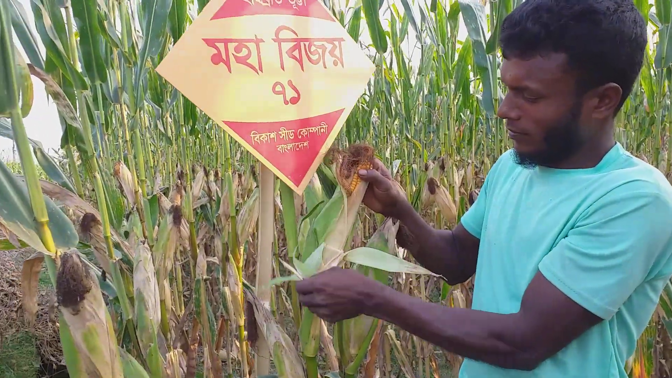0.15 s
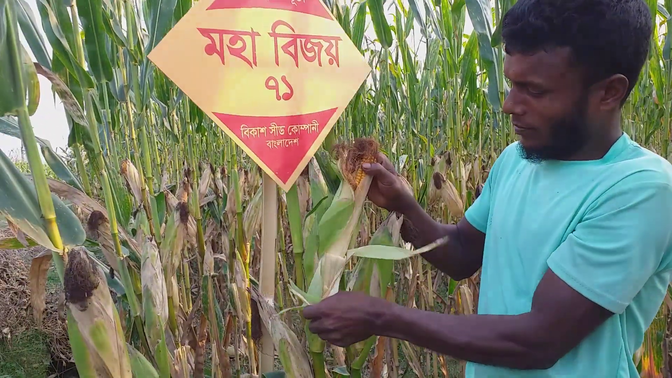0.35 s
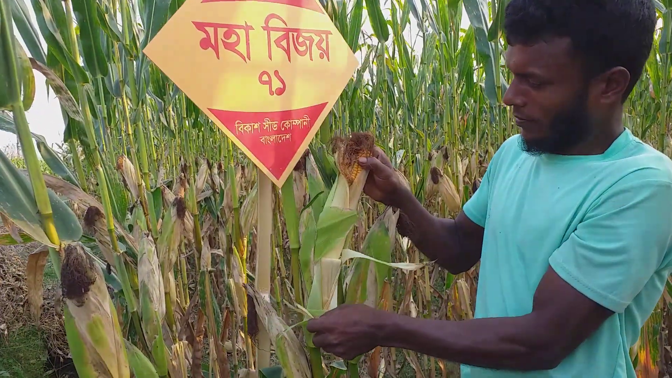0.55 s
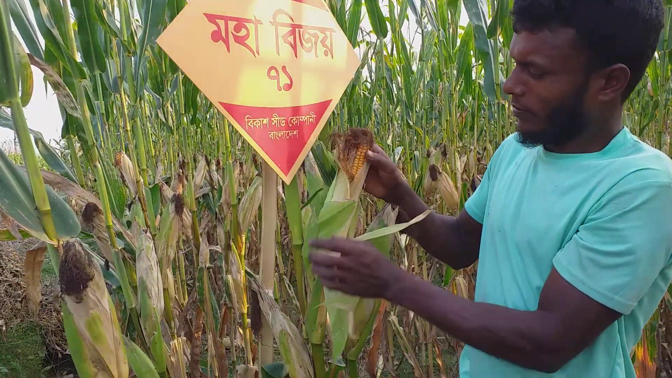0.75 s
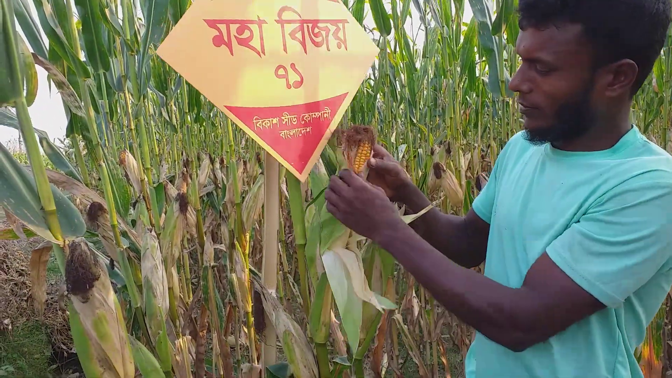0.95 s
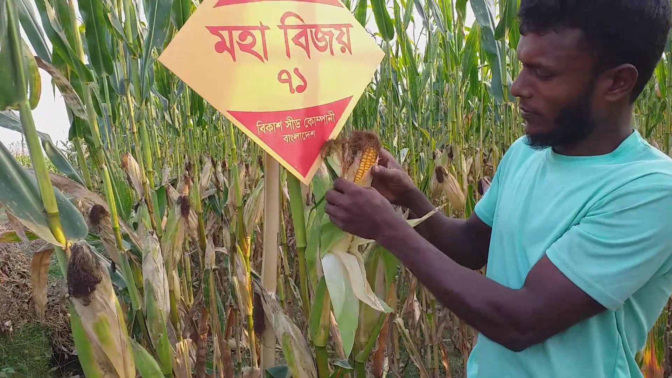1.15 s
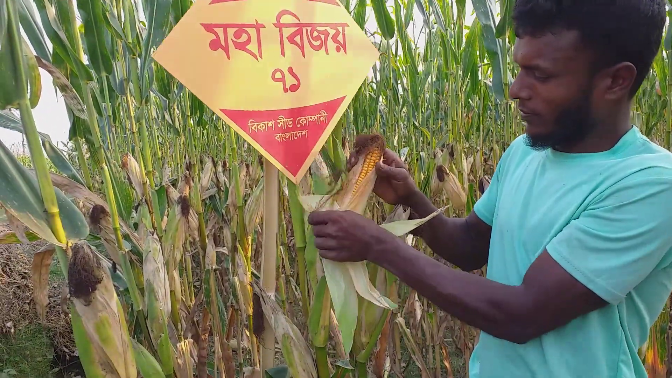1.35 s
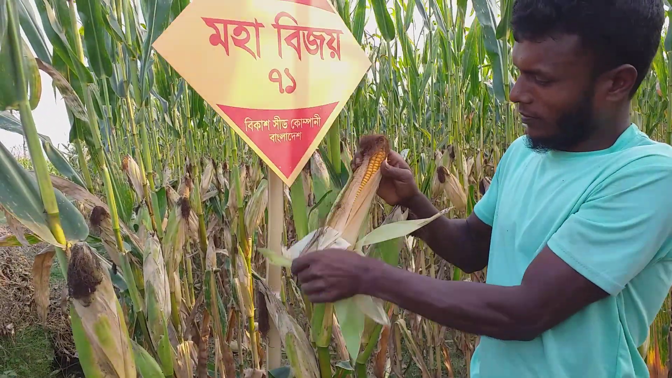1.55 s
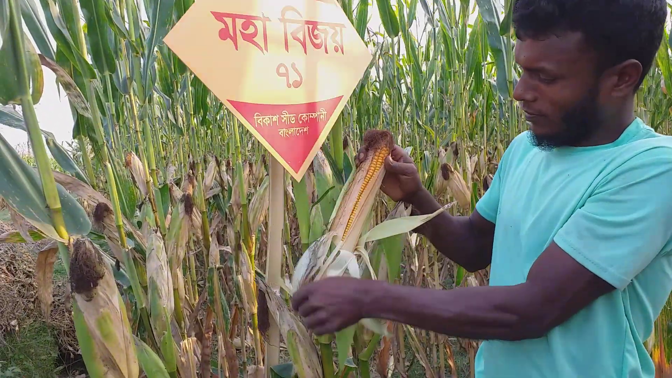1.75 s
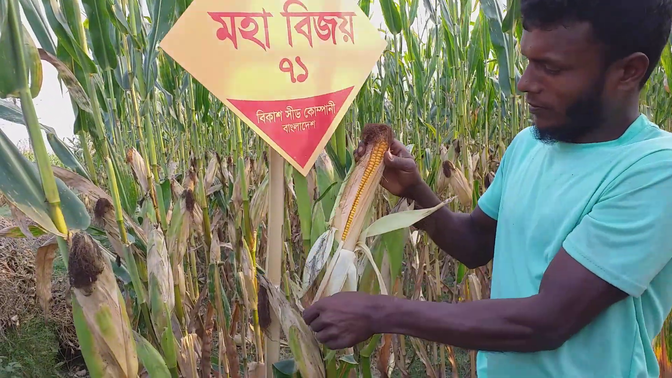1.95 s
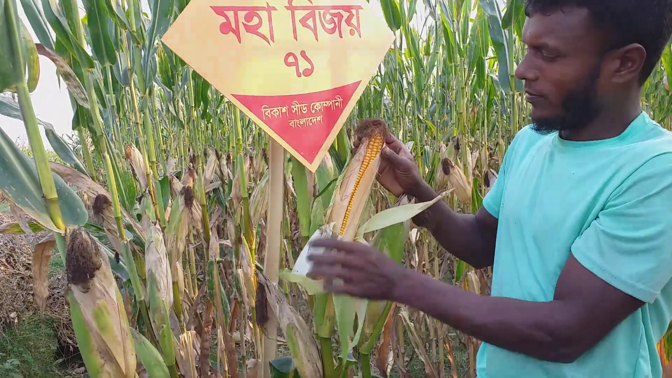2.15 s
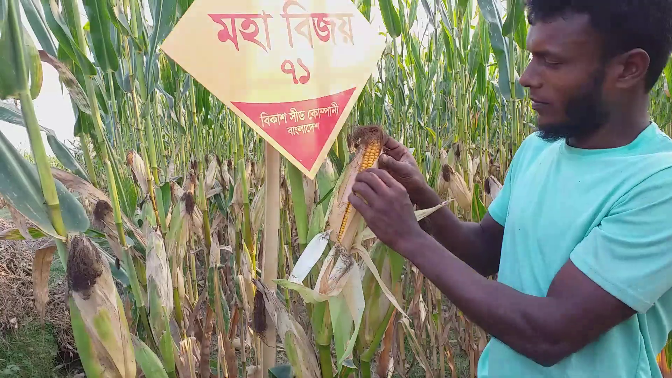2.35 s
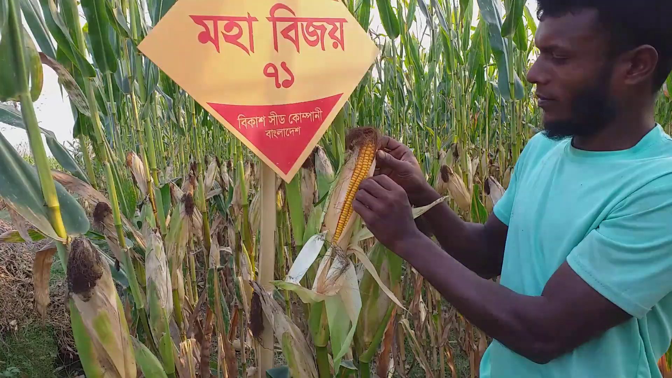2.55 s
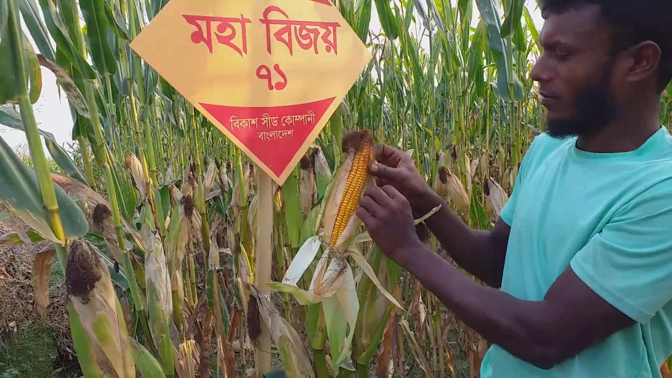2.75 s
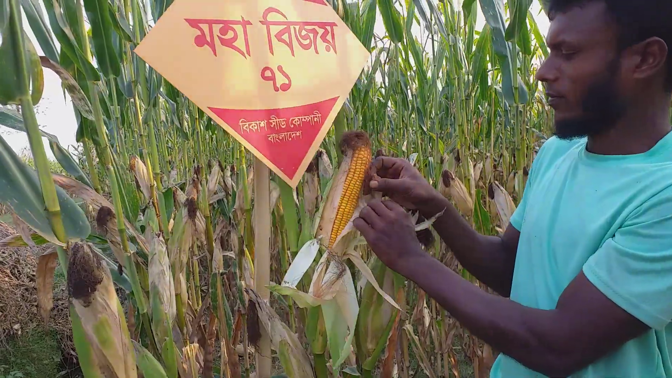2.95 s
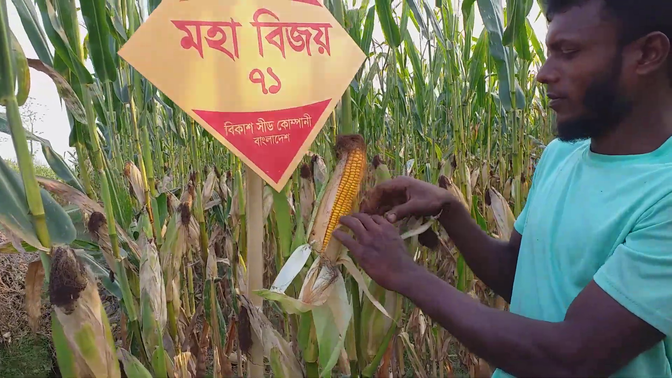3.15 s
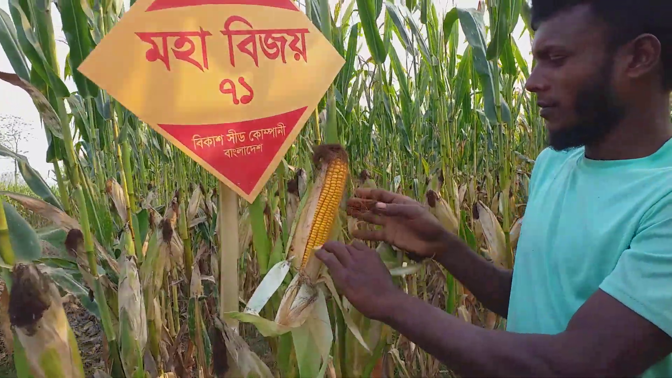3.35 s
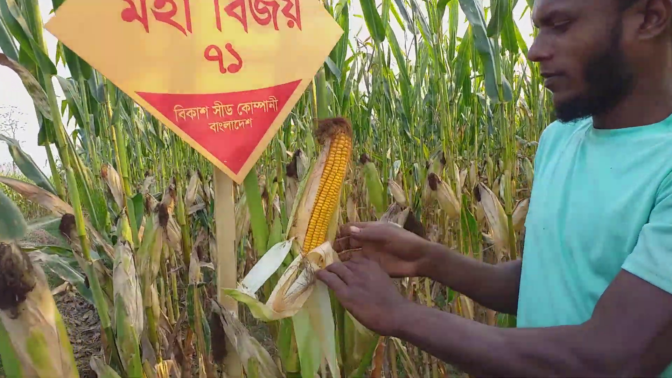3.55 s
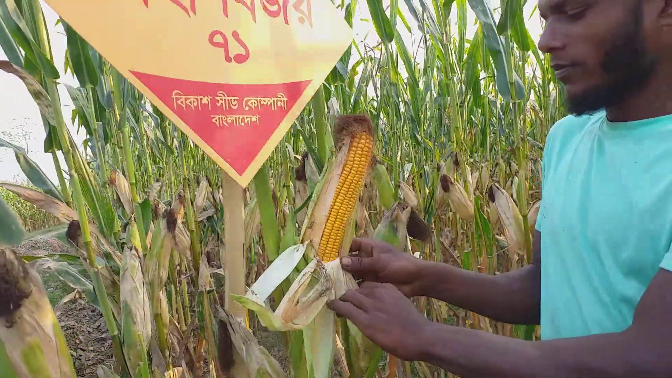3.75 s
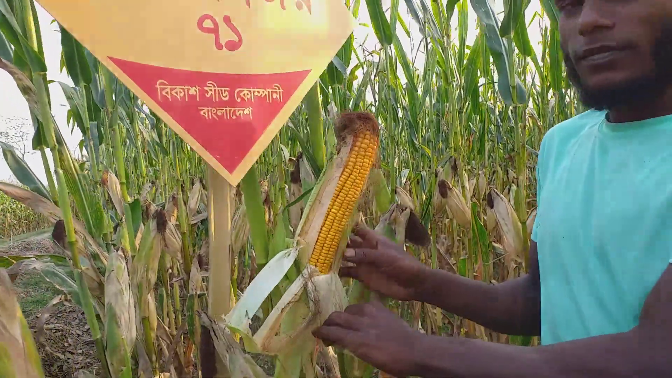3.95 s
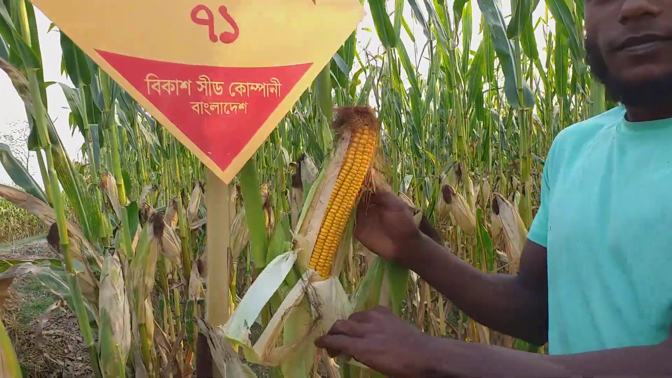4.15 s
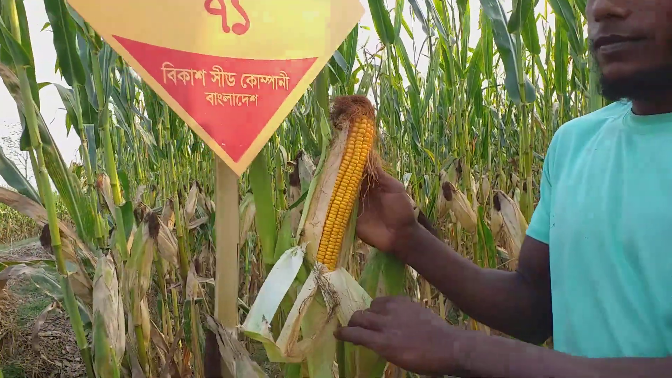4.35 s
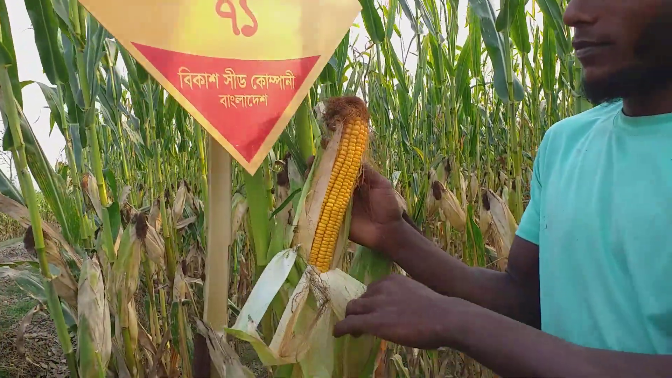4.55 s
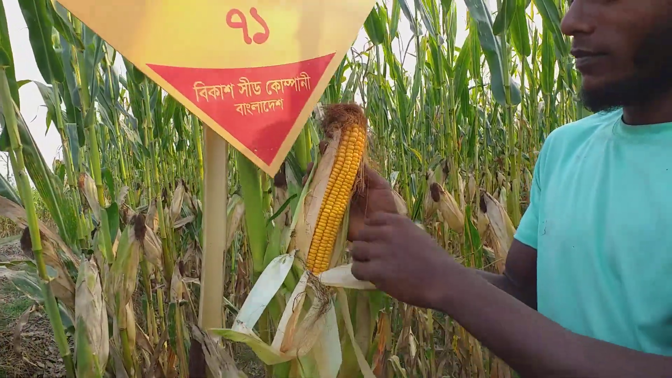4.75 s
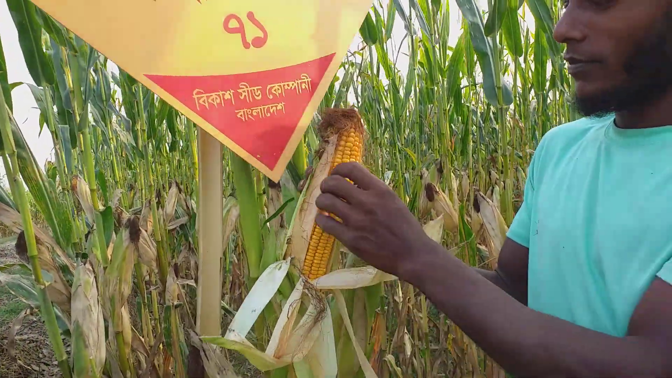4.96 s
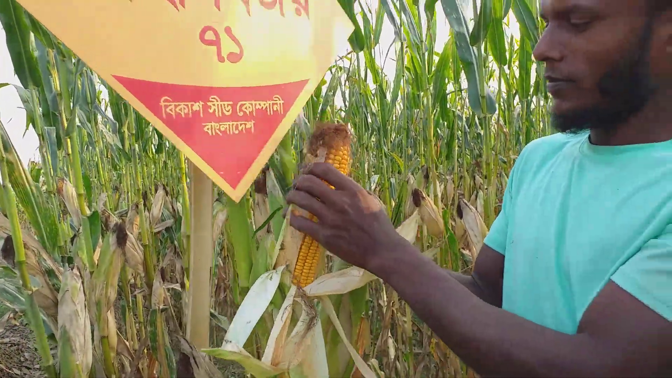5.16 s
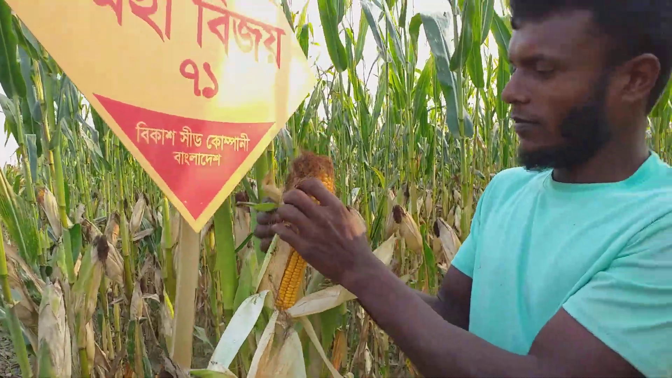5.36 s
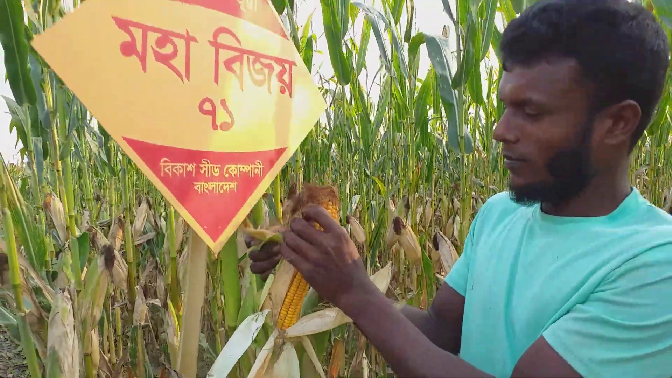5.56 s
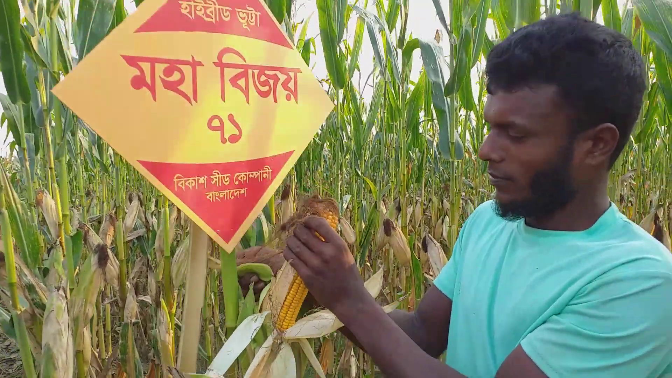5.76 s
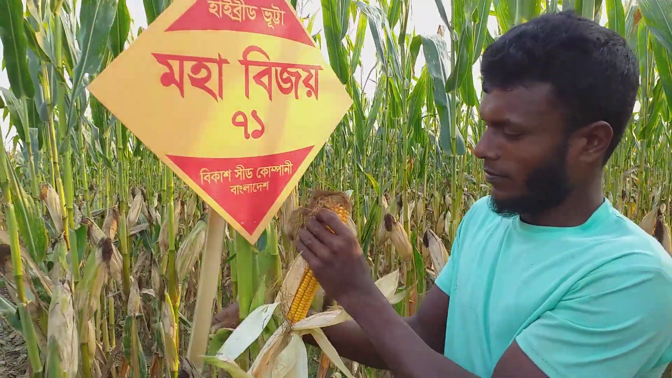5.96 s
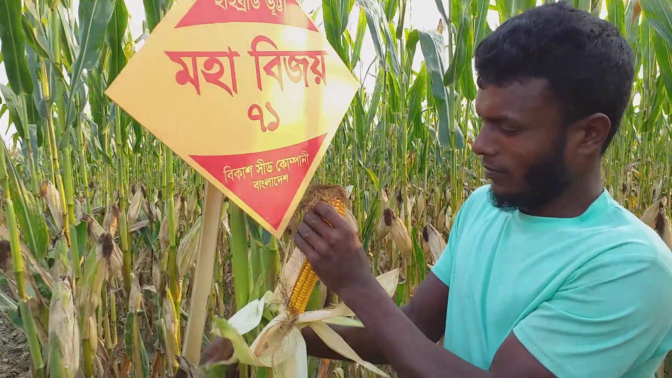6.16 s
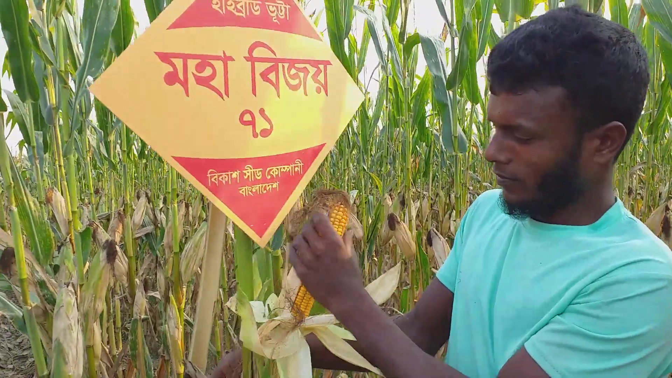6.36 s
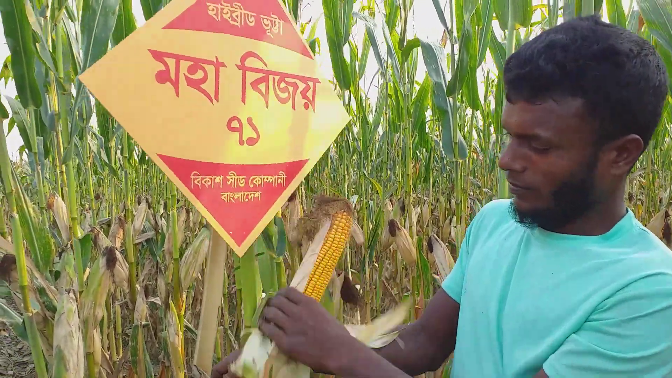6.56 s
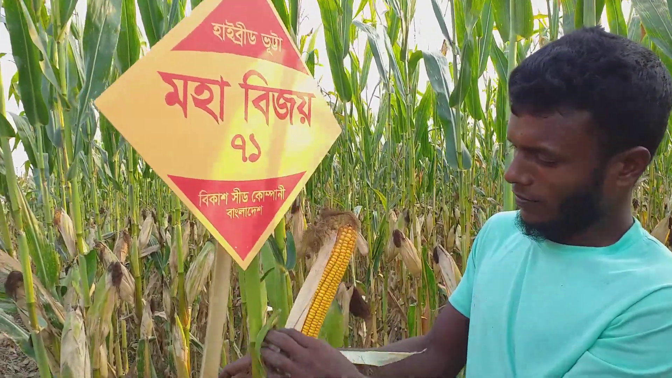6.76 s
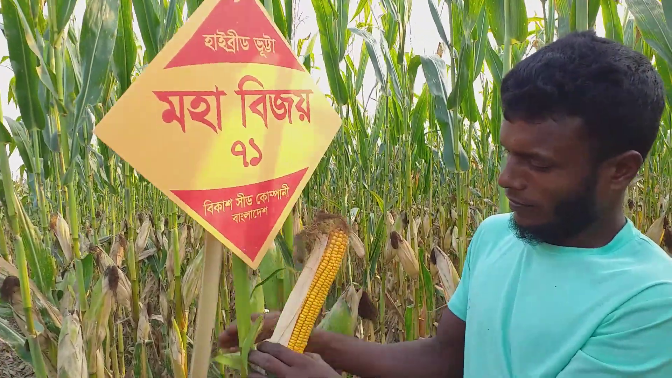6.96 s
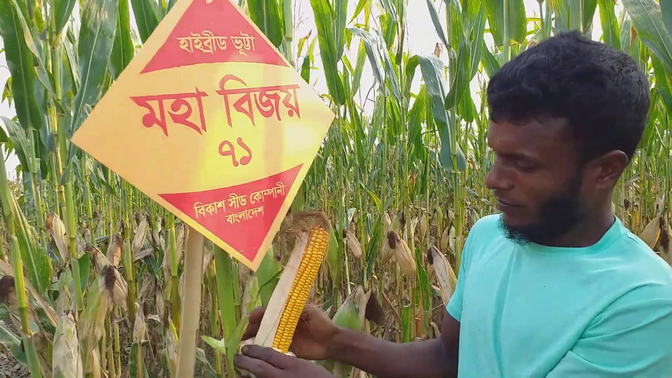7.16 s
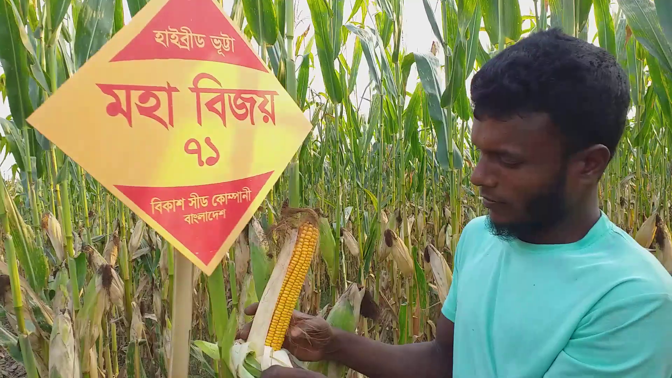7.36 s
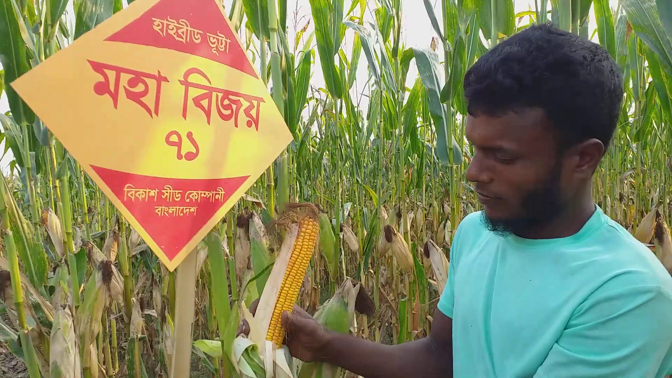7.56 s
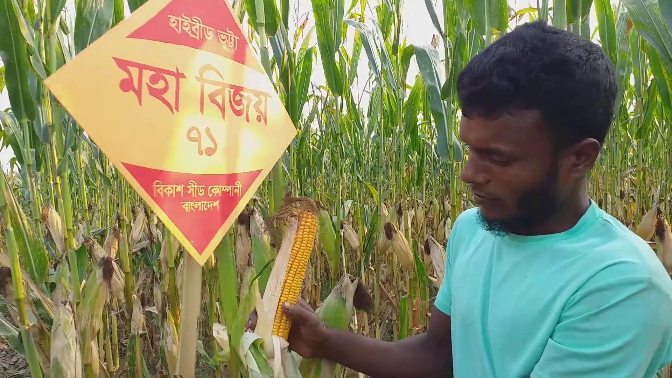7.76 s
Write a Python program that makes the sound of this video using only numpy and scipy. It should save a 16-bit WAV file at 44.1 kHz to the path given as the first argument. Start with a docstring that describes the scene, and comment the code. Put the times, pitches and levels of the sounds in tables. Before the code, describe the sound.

Dry, crisp husk tearing sits near the microphone outdoors, with only a weak scatter of echo from standing plants. Rapid rips start it, followed by brushing leaves, a second tearing run, a soft lull with dull bumps, and a loud cluster of snapping ribs. Later it becomes loose rustle, broken by a short hard snap and a closing rip, over low air and a distant, swelling hum.

```python
"""Husks are torn back by hand from an ear of corn in a quiet field: a quick run of pulls opens the scene.
Each pull is a fast run of fibre slips that rings the leaf; short squeaks sound near some pulls.
Loose husks rustle and ribs crack throughout, densest in the tearing after 3.3 s; soft bumps fall between.
A thin far whine comes and goes from 4.2 s; at 5.3 s two sharp ticks snap over a dull thump.
A last pull comes at 7.7 s; under it all lie a murmur of air and a distant hum that swells four times."""
import sys
import numpy as np
from scipy import signal
from scipy.fft import rfft, irfft, next_fast_len
from scipy.io import wavfile
from scipy.ndimage import uniform_filter1d

SR = 44100
rng = np.random.default_rng(int(sys.argv[2]) if len(sys.argv) > 2 else 0)


def bounce(signal):
    """Save signal as a 16-bit WAV file at the path given by the first command-line argument."""
    frames = np.transpose(np.atleast_2d(signal))
    limited = np.clip(frames, -1, 1)
    pcm = np.round(limited * 32767).astype(np.int16)
    wavfile.write(sys.argv[1], SR, pcm)


N = 348390
TIME_S = np.arange(N) / SR

# steady rubbing of the hands on the ear, before the rustle's trims:
# t/s, rubbing level/dB, leaf body re rubbing/dB, sheath hollow re rubbing/dB
CONTACT_CURVE = [(0, -32, -6.5, -14), (.55, -50, -9.5, -10.5), (1.1, -53.5, -7, -15),
                 (1.45, -47.5, -5, -4.5), (1.9, -50.5, -9.5, -12), (2.3, -53, -9.5, -29),
                 (2.95, -54.5, -10, -16), (3.3, -43, -9.5, -8), (4.05, -44.5, -10, -21),
                 (4.65, -46, -8.5, -15), (4.85, -50.5, -9.5, -14), (5.3, -44.5, -7.5, -13.5),
                 (6.28, -49.5, -4.5, -11), (6.55, -43.5, -8.5, -17.5), (7.62, -46.5, -9, -15.5),
                 (7.9, -41.5, -9, -20)]


def amp(db):
    """Decibels to gain."""
    return 10 ** (np.asarray(db) / 20)


def evened(x):
    """Scales to rms 1."""
    return x / np.sqrt(np.mean(x ** 2) + 1e-20)


def steadied(x, size):
    """Holds rms near 1 over every stretch of size samples; faster grain stays."""
    return x / np.sqrt(abs(uniform_filter1d(x ** 2, size)) + 1e-12)


def read(points, hz):
    """Reads a spectrum on a log-frequency axis."""
    f_hz, value = np.transpose(points)
    return np.interp(np.log(hz + 1), np.log(f_hz + 1), value)


def add(mix, start_s, sound):
    """Mixes a sound in at start_s, cut at the end of the mix."""
    part = mix[max(round(start_s * SR), 0):][:len(sound)]
    part += sound[:len(part)]


def colour(x, points, size=2048):
    """Minimum-phase filter with the given spectrum, so that clicks keep their sharp fronts."""
    hz = abs(np.fft.fftfreq(size, 1 / SR))
    log_gain = np.log(amp(read(points, hz)))
    taps = np.fft.ifft(np.exp(np.conj(signal.hilbert(log_gain)))).real
    return signal.fftconvolve(x, taps)[:len(x)]


def band(x, lo_hz, hi_hz):
    """Causal band-pass."""
    return signal.sosfilt(signal.butter(4, [lo_hz, hi_hz], "band", fs=SR, output="sos"), x)


def high_pass(hz):
    """Sections of a fourth-order high-pass."""
    return signal.butter(4, hz, "high", fs=SR, output="sos")


def registers(x):
    """Splits into top (unit level in 2.8-7 kHz), leaf body and sheath hollow (each rms 1)."""
    size = next_fast_len(len(x) + 512)
    hz, spectrum = np.fft.rfftfreq(size, 1 / SR), rfft(x, size)
    below_900, below_2800, below_7000 = [1 / (1 + (hz / edge_hz) ** 10) for edge_hz in (900, 2800, 7000)]
    gains = (below_900, below_2800 - below_900, below_7000 - below_2800, 1 - below_2800)
    hollow, body, crisp, top = (irfft(spectrum * gain, size)[:len(x)] for gain in gains)
    return top / np.std(crisp), evened(body), evened(hollow)


def resonate(x, hz, width_hz):
    """A resonance of gain 1 that follows the curve hz."""
    turn = np.exp(2j * np.pi * np.cumsum(hz) / SR)
    r = np.exp(-np.pi * width_hz / SR)
    return 2 * (turn * signal.lfilter([1 - r], [1, -r], x / turn)).real


def wander(count, size):
    """Smooth random curve of rms 1, twice averaged over size samples."""
    return evened(uniform_filter1d(uniform_filter1d(rng.standard_normal(count), size), size))


def grains(count, per_s, spread_db):
    """Sparse clicks of random sign: many small, a few large; rms 1."""
    sizes = amp(spread_db * np.minimum(rng.exponential(1, count), 4))
    signs = rng.choice([-1, 1], count)
    return evened(sizes * signs * (rng.random(count) < per_s / SR))


def swell(t, rise_s, hold_s, fall_s, curve=1.39):
    """Envelope from 0 to 1 and back: rise, hold, fall."""
    to_end_s = rise_s + hold_s + fall_s - t
    return np.clip(np.minimum(t / rise_s, to_end_s / fall_s), 0, 1) ** curve


def scatter(x, spread_s, share, count=4):
    """The leaf spreads every click over a millisecond or two, in a colour that shifts as it folds."""
    t = np.arange(300) / SR
    taps = rng.standard_normal((count, len(t))) * np.exp(-t / spread_s)
    taps /= np.linalg.norm(taps, axis=1)[:, None]
    folds = signal.fftconvolve(x[None], taps, axes=1)[:, :len(x)]
    weights = np.array([wander(len(x), size=700) for _ in range(count)])
    weights /= np.linalg.norm(weights, axis=0)
    return x + share * (folds * weights).sum(0)


def pull(start_s, rise_s, hold_s, fall_s, force_db, body_db, hollow_db, leaf_hz, fibre_hz, ring_db,
         median_slips_per_s=450, jitter=.28, uneven_db=0.5, fray_s=0.00062, leaf_ring=1., fibre_ring=0.77,
         build_db=1.5, glide=0.063, trim_db=-0.78):
    """Fibres let go one after another, almost regularly; each slip frays briefly and rings the leaf."""
    # filter for the fibre slips: f/Hz, gain/dB
    tearing = [(60, -29), (150, -13), (300, -21.5), (550, -9.5), (1000, -6.5), (1700, -2.5), (2450, -3.5),
               (3050, -4.5), (3500, 0), (4100, 4.5), (6000, 0), (8000, 0.5), (12000, -5), (16000, -3)]
    t = np.arange(0, rise_s + hold_s + fall_s, 1 / SR)
    progress = t / t[-1] - .5
    turns = np.cumsum(median_slips_per_s * np.exp(jitter * wander(len(t), size=50))) / SR
    slips = np.diff(np.floor(turns), prepend=0) * amp(uneven_db * rng.standard_normal(len(t)))
    fray_envelope = signal.lfilter([1], [1, -np.exp(-1 / (fray_s * SR))], slips)
    fraying = fray_envelope * rng.standard_normal(len(t))
    drive = colour(scatter(slips + .11 * fraying, spread_s=.0013, share=1.5), tearing)
    # leaf resonance rises and fibre resonance falls as the free length of the leaf changes
    leaf = resonate(drive, leaf_hz * (1 + glide * progress), width_hz=610)
    fibre = resonate(drive, fibre_hz * (1 - glide * progress), width_hz=480)
    ringing = amp(ring_db) * (leaf_ring * leaf + fibre_ring * fibre)
    crisp, body, hollow = registers(steadied(drive + ringing, size=600))
    # build_db: growth of the force over the whole pull
    force = swell(t, rise_s, hold_s, fall_s) * amp(force_db + build_db * progress + trim_db)
    return start_s, force * (crisp + amp(body_db) * body + amp(hollow_db) * hollow)


def crack(start_s, peak_db, body_db, hollow_db, crumble_s, crumble=0.5, break_s=0.00044, trim_db=1):
    """A rib gives way in a burst that peaks within half a millisecond, then its neighbours crumble."""
    # filter for breaking ribs: f/Hz, gain/dB
    cracking = [(60, -30), (150, -15), (400, -6.5), (1000, -4), (2200, -2), (3200, 0), (4500, 7.5),
                (6500, 6.5), (9000, 3.5), (16000, 3.5)]
    t = np.arange(1800) / SR
    burst = t / break_s * np.exp(1 - t / break_s) * rng.standard_normal(len(t))
    decay = crumble * (t > 2 * break_s) * np.exp(-t / crumble_s)
    after = decay * grains(len(t), per_s=13000, spread_db=4.0)
    crisp, body, hollow = registers(colour(burst + after, cracking))
    height = abs(band(crisp, 2800, 7000)).max()
    mixed = crisp + amp(body_db) * body + amp(hollow_db) * hollow
    return start_s, amp(peak_db + trim_db) * mixed / height


def ticks(count=120, mean_per_s=7, over_db=11.5, spread_db=2.5, body_db=-10, hollow_db=-16):
    """Small ribs break at random moments, louder where the steady rubbing is harder."""
    out = np.zeros(N)
    times_s = np.cumsum(rng.exponential(1, count)) / mean_per_s
    offsets_db = spread_db * rng.standard_normal((count, 3))
    for start_s, (size, body, hollow) in zip(times_s, offsets_db):
        peak_db = np.interp(start_s, *np.transpose(CONTACT_CURVE)[:2]) + over_db + size
        add(out, *crack(start_s, peak_db, body_db + body, hollow_db + hollow, crumble_s=0.0047))
    return out


def squeak(start_s, length_s, start_hz, end_hz, level_db, waver=0.021, overtone_db=-4):
    """Wet leaf squeaks on leaf: the slips lock into a short, unsteady note with two overtones."""
    count = int(length_s * SR)
    pitch_hz = np.linspace(start_hz, end_hz, count) * (1 + waver * wander(count, size=60))
    phase = 2 * np.pi * np.cumsum(pitch_hz) / SR
    note = sum(amp(overtone_db * k) * np.sin((k + 1) * phase) for k in range(3))
    return start_s, amp(level_db) * evened(note) * signal.windows.tukey(count, .6)


def snap(start_s=5.3151, thump_hz=380, thump_s=0.0012, thump_db=-5, push_hz=190, push_s=0.0019, push_db=-17,
         tick_db=2, second_db=-3, second_s=0.00182, tail_db=-42, tail_s=0.089):
    """Two ticks in quick succession over a heavily damped thump, with a faint low tail."""
    t = np.arange(SR // 3) / SR
    thump = amp(thump_db) * np.exp(-t / thump_s) * np.cos(2 * np.pi * thump_hz * t + np.pi / 4)
    push = -amp(push_db) * np.exp(-t / push_s) * np.cos(2 * np.pi * push_hz * t)
    clicks = np.zeros(len(t))
    clicks[[0, round(second_s * SR)]] = amp(tick_db), amp(second_db)
    # f/Hz, gain/dB
    clicks = colour(clicks, [(200, 4), (1500, -1.5), (4600, 3.0), (7000, -2), (12000, -0.5)])
    tail = amp(tail_db) * np.exp(-t / tail_s) * evened(band(rng.standard_normal(len(t)), 92, 630))
    return start_s, band(thump + push, 99, 7500) + clicks + tail


def rustle(rub=1., clump_db=0.92, trim_db=-.5, fizzle_s=0.0023, hollow_trim_db=-3.0, sizzle_edge_hz=8500):
    """Dry leaves slide over each other: clumps of tiny crackles over a soft rubbing hiss."""
    # filter for sliding leaves: f/Hz, gain/dB
    rustling = [(50, -20), (120, -8), (250, -11), (400, -6), (800, -7.5), (1200, -3.5), (1700, -0.5),
                (2400, 0), (3100, -1), (4100, 4.5), (5400, 1.5), (6600, 3), (9000, 0), (16000, 0)]
    clicks = grains(N, per_s=700, spread_db=2.5)
    # every crackle starts at once and fizzles out
    crackles = signal.lfilter([1], [1, -np.exp(-1 / (fizzle_s * SR))], clicks ** 2)
    drive = np.sqrt(crackles / crackles.mean() + rub ** 2) * rng.standard_normal(N)
    drive = steadied(drive * amp(clump_db * wander(N, size=220)), size=2000)
    top, body, hollow = registers(colour(drive, rustling))
    sizzle = signal.sosfiltfilt(high_pass(sizzle_edge_hz), top)
    layers = [top - sizzle, body, amp(hollow_trim_db) * hollow, sizzle]
    return amp(trim_db) * (rubbing() * layers).sum(0)


def rubbing(rise_share=0.18, fall_share=0.33):
    """Strength of crisp top, leaf body, sheath hollow and sizzle: powers of contact and strokes add."""
    # loose husks brushed aside, before the rustle's trims: start t/s, length/s, rubbing level/dB,
    # leaf body re rubbing/dB, sheath hollow re rubbing/dB, papery sizzle re rubbing/dB
    strokes = [ (0.136, .14, -48, -9, -10, -1), (0.333, 0.17, -45, -3.5, -15, -1),
               (0.564, 0.047, -40, -19, -17, 4), (0.634, 0.056, -47, -10, -27, 4.5),
               (0.72, 0.042, -46.5, -8, -16, -2), (0.763, 0.078, -46.5, -5, -10, -6),
               (0.977, 0.2, -48.5, -9, -20, -2), (1.155, 0.066, -45, -12, -22, -3),
               (1.274, .12, -41, -1, -11, -14), (1.59, 0.17, -41.5, -7.5, -11.5, -2.5),
               (1.807, 0.1, -51.5, -11, -13, 10), (1.923, 0.077, -49.5, -12, -18, 0),
               (2.01, 0.25, -50.5, -11.5, -16, 2), (2.401, 0.13, -43.5, -14, -15, 4.5),
               (2.497, 0.1, -52, -6, -8, -1), (2.622, 0.36, -47.5, -9.5, -12.5, -0.5),
               (2.98, 0.17, -53.5, -6, -18, -1), (3.12, .1, -42, -7.5, -6.5, -2),
               (3.247, 0.028, -38.5, -10, -7, 8.5), (3.267, 0.048, -40.5, -8, -23, -12),
               (3.306, .028, -36.5, -11, -12, 5), (3.342, 0.068, -38, -7, -25, -7),
               (3.636, 0.18, -35.5, -13, -21, -1), (3.768, 0.064, -32, -18, -18.5, 0),
               (4.025, .05, -40, -24, -35, 0), (4.115, 0.036, -44.5, -13, -32, -2),
               (4.896, 0.031, -44.5, -9, -20, -13), (5.168, 0.038, -42.5, -12, -24, 3),
               (5.28, 0.22, -44, -3.5, -8, 2), (5.63, 0.31, -49, 2, -5.5, 0),
               (5.796, 0.22, -42, -3.5, -11, -0.5), (6.109, 0.17, -40.5, -4, -13.5, 0.5),
               (6.332, 0.21, -45, -5.5, -16, 0), (6.48, 0.19, -40, -13, -23, 2),
               (6.756, 0.13, -38, -7, -29, 2), (7.004, 0.073, -39, -14, -19, 0),
               (7.219, .04, -42.5, -5, -28, 6), (7.413, .15, -38.5, -9, -15, 2),
               (7.694, .11, -35, -7, -20.5, 3), (7.812, 0.11, -42.5, -16, -14.5, 6), ]
    t, *columns = np.transpose(CONTACT_CURVE)
    level_db, body_db, hollow_db = (np.interp(TIME_S, t, c) for c in columns)
    power = amp([level_db, level_db + body_db, level_db + hollow_db, level_db]) ** 2
    for start_s, length_s, level_db, *shares_db in strokes:
        rise_s, fall_s = rise_share * length_s, fall_share * length_s
        envelope = swell(np.arange(0, length_s, 1 / SR), rise_s, length_s - rise_s - fall_s, fall_s)
        stroke = amp(level_db) * envelope
        for register, share_db in zip(power, [0] + shares_db):
            add(register, start_s, (amp(share_db) * stroke) ** 2)
    return np.sqrt(power)


def bump(start_s, hz, peak_db, cycles=3.8):
    """A soft, dull contact: band noise around hz that dies within a few cycles."""
    t = np.arange(SR // 8) / SR
    thud = band(rng.standard_normal(len(t)) * np.exp(-t * hz / cycles), 0.58 * hz, 1.76 * hz)
    return start_s, amp(peak_db) * thud / abs(thud).max()


def stalks(x, t60_s=0.19, wet_db=-16):
    """The standing plants scatter back a short, weak tail of sparse random echoes."""
    t = np.arange(SR // 3) / SR
    echoes = rng.standard_normal(len(t)) * (rng.random(len(t)) < 2000 / SR)
    taps = echoes * (t > .003) * amp(-60 * t / t60_s)
    return x + amp(wet_db) * signal.fftconvolve(x, taps / np.linalg.norm(taps))[:N]


def whine(start_s, length_s, start_hz, end_hz, level_db, waver=0.0047, flutter_db=2):
    """A faint, unsteady gliding tone that fades in and out."""
    count = int(length_s * SR)
    pitch_hz = np.linspace(start_hz, end_hz, count) * (1 + waver * wander(count, size=500))
    tone = np.sin(2 * np.pi * np.cumsum(pitch_hz) / SR)
    tone = evened(tone * amp(flutter_db * wander(count, size=900)))
    return start_s, amp(level_db) * tone * signal.windows.tukey(count, .6)


def field(air_db=-60, hum_hz=380, swell_s=0.17, rest_db=-82.5):
    """Low outdoor murmur of coloured noise, with a narrow-band hum far away."""
    # filter for the murmur of the air: f/Hz, gain/dB
    air_spectrum = [(25, -20), (42, -10), (55, 4), (95, 2.5), (140, -3), (220, -13.5), (380, -9), (700, -9),
                    (1500, -42), (4000, -5.5), (16000, -30.5)]
    # swells of the distant hum: middle t/s, level added to the resting hum/dB
    hum_swells = [(.75, -64), (2.5, -69.5), (5.1, -67), (7.2, -63.5)]
    air = evened(colour(rng.standard_normal(N), air_spectrum, size=8192))
    air *= amp(air_db + 0.78 * wander(N, size=6000))
    strength = amp(rest_db)
    for middle_s, level_db in hum_swells:
        strength = strength + amp(level_db) * np.exp(-((TIME_S - middle_s) / swell_s) ** 2)
    return air + strength * evened(band(rng.standard_normal(N), 0.852 * hum_hz, 1.168 * hum_hz))


def scene():
    """Husk sounds scattered by the plants, over the field, with the whines and the snap."""
    # husks torn back: start t/s, rise/s, hold/s, fall/s, force before trim/dB, leaf body re force/dB,
    # sheath hollow re force/dB, leaf resonance f/Hz, fibre resonance f/Hz, ringing re slips/dB
    pulls = [ (0, .003, 0.057, .01, -23, -7.5, -20, 2170, 5050, 9),
             (0.055, .008, 0.041, .03, -20.5, -8, -24, 2350, 4700, 2),
             (0.138, .035, 0.034, .03, -34, -8.5, -19, 1790, 4950, 20),
             (0.209, 0.044, 0.048, .105, -29, -1.5, -18, 1780, 4400, 4),
             (0.372, 0.037, .04, 0.056, -40, -9, -23.5, 1750, 4330, 7),
             (1.172, 0.059, 0.021, 0.088, -33.5, -9, -22, 1730, 4280, 1),
             (1.44, 0.047, 0.1, .05, -27.5, -6, -20, 1960, 4400, -4),
             (1.668, 0.021, 0.037, 0.026, -38, -2, -9, 1680, 4060, -7),
             (1.738, 0.029, 0.025, 0.022, -21, -16.5, -19.5, 1970, 4200, 3),
             (3.372, .007, 0.021, 0.014, -28.5, -11.5, -29, 2010, 4730, 3),
             (3.4, .015, .13, .012, -31, -4.5, -19.5, 2140, 5400, 0),
             (3.577, 0.02, 0.022, .012, -28.5, -3, -19.5, 2080, 5240, -3),
             (3.618, .007, .036, 0.015, -22.5, -6.5, -29.5, 2130, 4720, 9),
             (3.861, 0.0081, 0.012, 0.021, -29.5, -2, -19.5, 2420, 4610, -3),
             (7.731, 0.019, .006, 0.026, -24.5, -5.5, -25.5, 2120, 4150, -1), ]
    # ribs breaking: t/s, peak of the 2.8-7 kHz band before trim/dB, body re crispness/dB,
    # hollow re crispness/dB, crumbling decay/s
    cracks = [ (.184, -35, -19, -26, .005), (0.485, -29.5, -4, -30, .005), (.5765, -29, -13, -19, 0.0092),
              (1.0524, -39, 8, -28, .006), (1.172, -31, -16, -33, .008), (1.3019, -14.5, -32, -48, 0.0078),
              (1.352, -26.5, -22, -22, 0.004), (1.4372, -18.5, -9, -17, 0.0089),
              (1.4614, -13, -14, -29, 0.0066), (1.702, -26.5, 0, -10, 0.006), (1.7312, -25, 1, -7, 0.0035),
              (1.744, -28, 4, -10, 0.005), (1.7542, -13.5, -6, -11, .004),
              (1.8656, -29.5, -22, -34, 0.0044), (3.2543, -33, -8, -11, .011), (3.318, -29, -15, -9, .011),
              (3.378, -25, -22, -29, 0.0043), (3.5544, -4, -29, -45, 0.0077),
              (3.5807, -14.5, -15, -33, 0.0082), (3.6251, -12, -22, -42, 0.0042),
              (3.659, -20, -19, -40, .005), (3.747, -15, -11.5, -35, .005), (3.774, -21, -10, -18, 0.0037),
              (3.7828, -17, -13, -18, .005), (3.828, -19.5, -9.5, -15, 0.0095),
              (3.8636, -22, 2, -16, 0.007), (3.8854, -19.5, -16, -33, 0.0062),
              (3.9186, -24, -21, -22, 0.0052), (4.0275, -24, -23, -39, 0.0036),
              (4.121, -26, -17, -42, .005), (4.2653, -30, -22, -34, 0.0044), (4.5405, -34, -6, -21, .005),
              (4.6547, -29.5, -24, -32, 0.0065), (4.9034, -36, 1, -25, 0.0056), (5.0284, -36, -4, -1, .005),
              (5.553, -31, -7, -24, 0.0079), (5.6405, -27, 1.5, -32, 0.0034),
              (5.8934, -35.5, 10, -12, 0.008), (5.9264, -35.5, 12, -14, .009),
              (6.132, -28, -16, -24, 0.0044), (6.2031, -30, 1, -5.5, .006),
              (6.316, -27.5, -7.5, -21, 0.012), (6.363, -29.5, -4.5, -24, 0.0068),
              (6.9385, -37, 7.5, -19, 0.0054), (7.4444, -30, -15, -24, .008), (7.656, -28, -6, -25, 0.0079),
              (7.7467, -14.5, -4, -40, .006), (7.803, -22, -16, -32, 0.0062), ]
    # wet leaf squeaking on leaf: start t/s, length/s, start f/Hz, end f/Hz, level/dB
    squeaks = [(.0, 0.041, 554, 470, -38.5), (0.023, 0.032, 1067, 863, -34), (0.047, 0.015, 765, 540, -37),
               (.066, 0.046, 456, 556, -43), (1.456, 0.031, 957, 985, -35.5),
               (1.506, 0.012, 970, 940, -34.5), (1.749, 0.0333, 1065, 860, -35),
               (3.366, 0.05, 1003, 960, -36.5), (3.412, 0.0264, 947, 850, -35)]
    # fingers and leaves bumping softly on the ear and its stalk: t/s, f/Hz, peak level/dB
    bumps = [(0.143, 110, -54), (1.348, 120, -73), (2.72, 524, -43), (2.742, 600, -36.5), (2.772, 563, -50),
             (2.806, 560, -42), (2.884, 910, -40.5), (3.155, 483, -44), (3.254, 590, -37),
             (3.314, 476, -42), (3.558, 378, -41.5), (4.404, 100, -50.5), (5.417, 380, -43)]
    # thin whine far off: start t/s, length/s, start f/Hz, end f/Hz, level/dB
    whines = [(4.15, 0.28, 1510, 1492, -63.5), (4.7, 0.2, 1510, 1480, -63.5),
              (5.013, 0.22, 1544, 1580, -61), (5.799, .17, 1570, 1620, -52), (5.92, 0.13, 1520, 1515, -59),
              (6.181, 0.45, 1605, 1660, -60), (6.497, .28, 1640, 1690, -56), (6.719, 0.26, 1590, 1586, -58),
              (7.26, 0.25, 1490, 1500, -65)]
    husk = rustle() + ticks()
    for source, table in ((pull, pulls), (crack, cracks), (squeak, squeaks), (bump, bumps)):
        for row in table:
            add(husk, *source(*row))
    mix = stalks(husk) + field()
    for row in whines:
        add(mix, *whine(*row))
    add(mix, *snap())
    return mix[None]


def record(dry, fall_db_per_khz=11, edge_hz=15900):
    """The treble rolls off above a moving knee onto a faint sizzle; then bass cut and band limit."""
    # treble dulling and opening: t/s, roll-off knee f/Hz, sizzle offset level/dB
    brightness = [(0, 6940, 1.5), (1.4, 7260, 2.5), (1.8, 6950, -1), (3.28, 6500, -3), (3.4, 6250, -4.5),
                  (3.52, 6100, -5), (3.556, 6000, -14), (3.63, 5840, -9), (3.9, 5750, -7.5),
                  (5.0, 6090, -4), (5.5, 6770, 1), (5.9, 7100, 2.5), (6.5, 6080, -4), (7.0, 5580, -6),
                  (7.9, 4800, -12.5)]
    # least treble gain, before the sizzle offset: f/Hz, gain/dB
    sizzle_floor = [(6000, -42), (8200, -18.5), (9300, -22), (10400, -18), (11800, -11.5), (14000, -9),
                    (16000, -8.5)]
    hz, frames_s, spectra = signal.stft(dry, SR, nperseg=256, noverlap=192)
    t, *columns = np.transpose(brightness)
    knee_hz, sizzle_db = (np.interp(frames_s, t, c) for c in columns)
    over_khz = np.maximum(hz[:, None] - knee_hz, 0) / 1000
    floor = amp(read(sizzle_floor, hz)[:, None] + sizzle_db)
    gain = np.maximum(amp(-fall_db_per_khz * over_khz), floor)
    dulled = signal.istft(spectra * gain, SR, nperseg=256, noverlap=192)[1][:, :N]
    dulled = signal.sosfilt(high_pass(50), dulled)
    limit = signal.firwin(511, edge_hz, window=("kaiser", 9), fs=SR)
    return signal.oaconvolve(dulled, limit[None], "same")


dry = scene()
out = record(dry)
bounce(out)
```